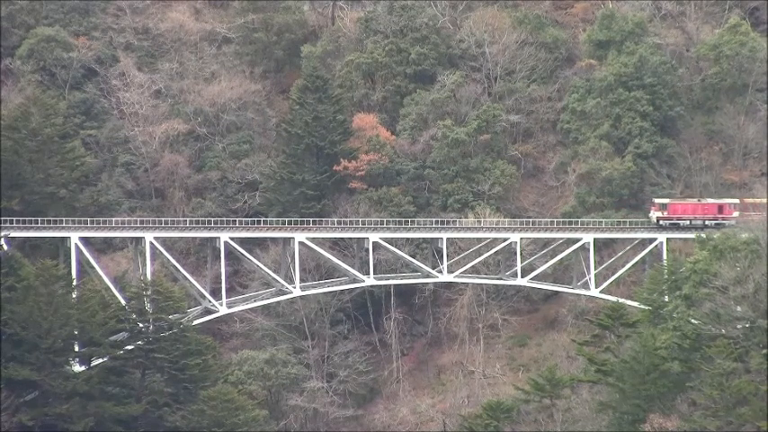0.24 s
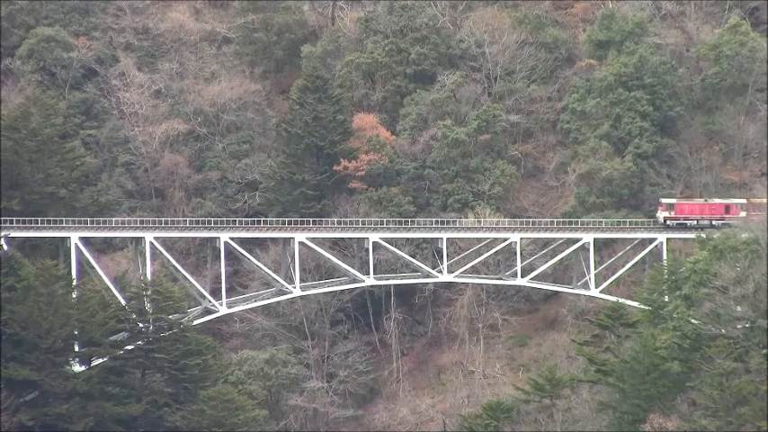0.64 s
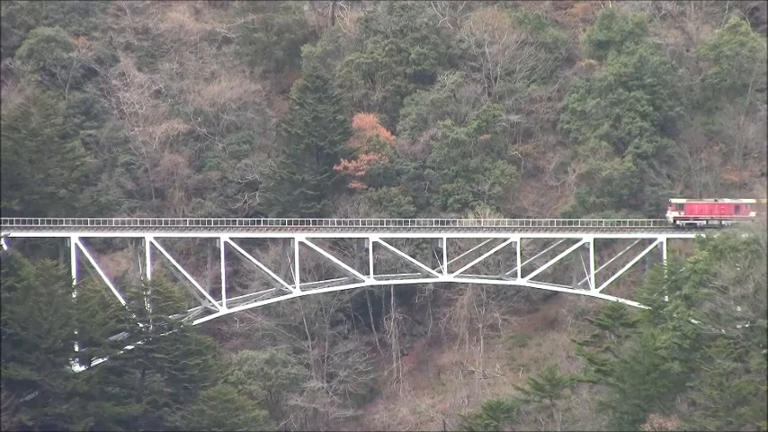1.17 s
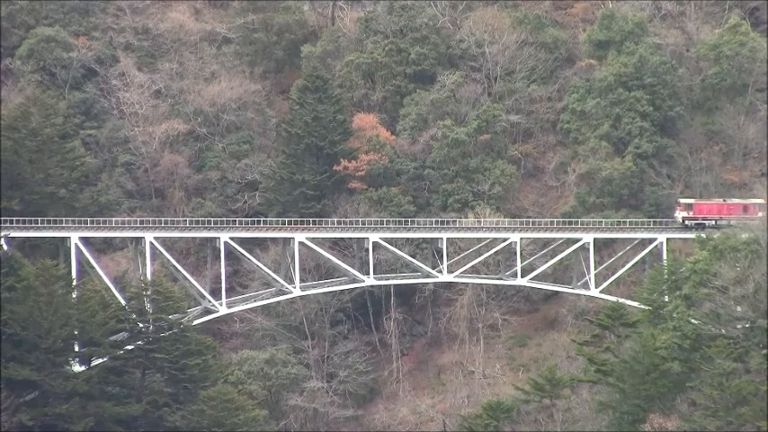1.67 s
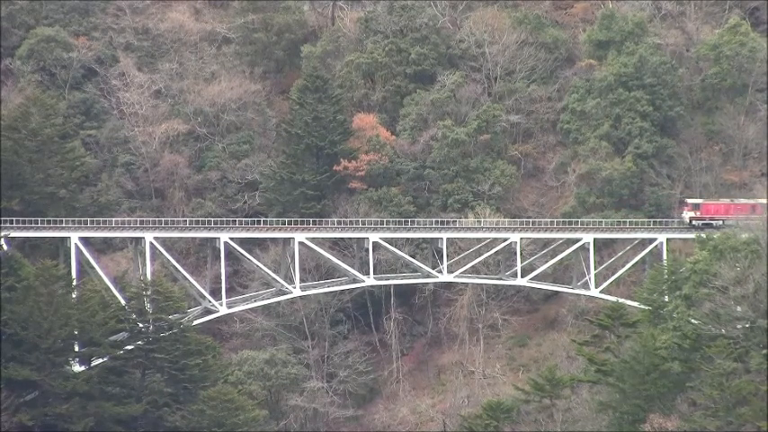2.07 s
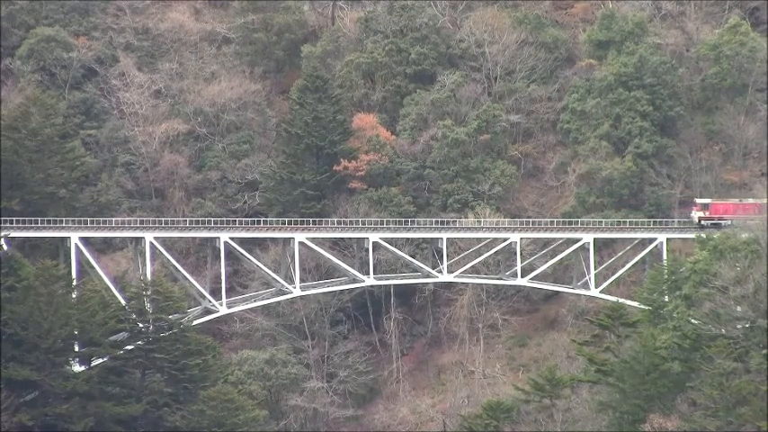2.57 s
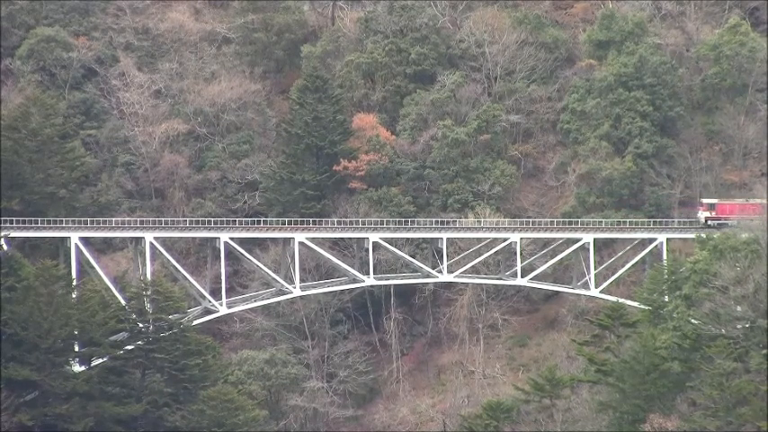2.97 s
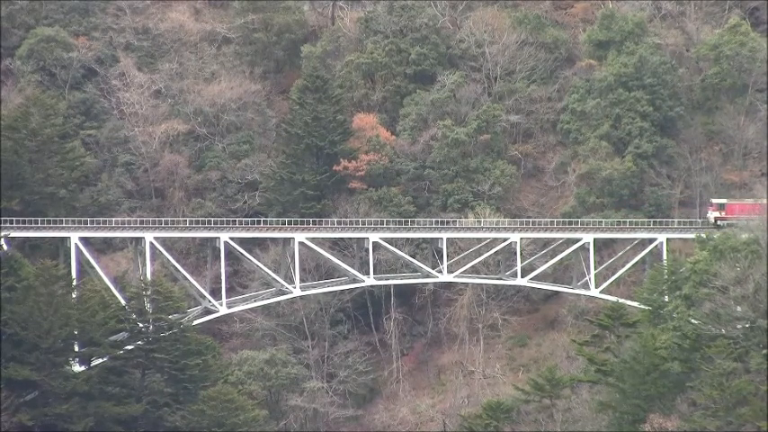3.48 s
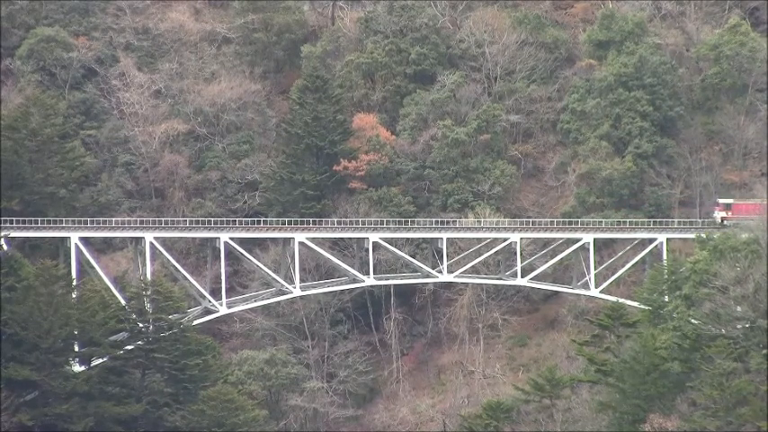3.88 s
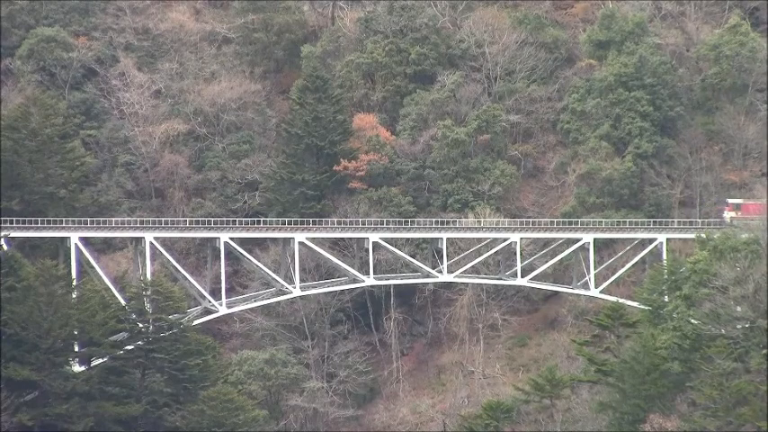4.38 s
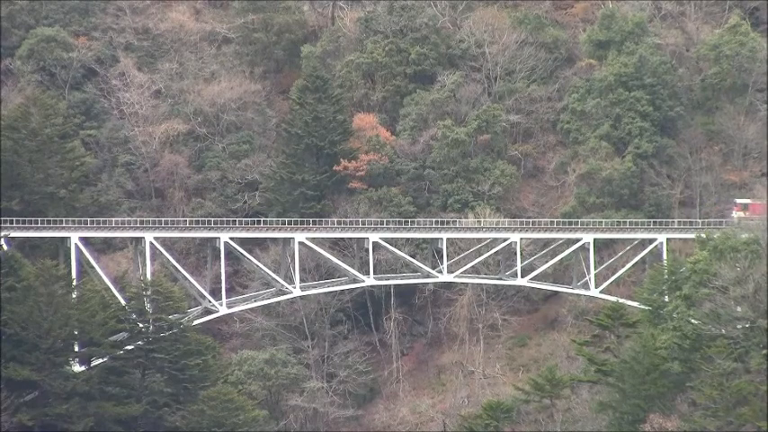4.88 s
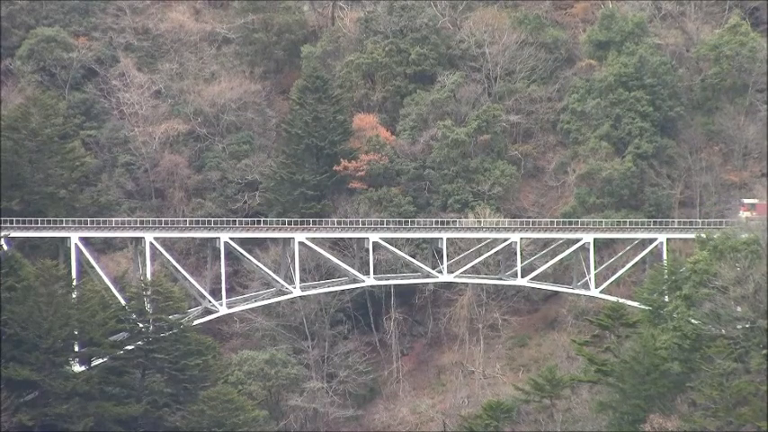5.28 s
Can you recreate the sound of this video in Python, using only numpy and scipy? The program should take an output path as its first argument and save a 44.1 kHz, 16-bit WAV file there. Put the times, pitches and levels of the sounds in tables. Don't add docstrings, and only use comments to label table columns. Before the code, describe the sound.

Birds chirp over a faint far train rumble while a camera clicks three times up close, followed by a hard latch click and sleeve rubbing.

```python
import sys
import numpy as np
from scipy import signal
from scipy.io import wavfile

SR = 44100
rng = np.random.default_rng(int(sys.argv[2]) if len(sys.argv) > 2 else 0)


def log_audio(samples):
    frames = np.atleast_2d(samples).T
    limited = np.clip(frames, -1, 1)
    pcm = np.round(limited * 32767).astype(np.int16)
    wavfile.write(sys.argv[1], SR, pcm)


def invert_db(x):
    u = np.asarray(x, float) / 20
    return 10 ** u


N = 244297

# time in seconds, gust in dB, liveliness of the far birds in dB.
AIR = [(0, 0.3, 4.5), (.62, -0.4, -0.5), (0.999, 0, 5), (1.5, 0, 1), (2.0, 1.4, 1), (2.45, 2, 3),
       (2.75, 1.4, -3.5), (3.4, 0, -6), (3.6, 0.5, -1.5), (4.15, -3, -2.5), (4.5, -2.5, 0.5),
       (4.8, -8.5, -3), (5.0, -5, 0.5), (5.54, -3.5, -3)]
# frequency in Hz, likeness from 0 to 1.
LIKENESS = [(60, 0.82), (180, 0.65), (550, 0.39), (1650, 0.82), (4970, 0.95), (15000, 0.33)]
# time of the shutter snap in seconds, strength in dB.
SHOTS = [
    (0.7518, -1.5),
    (1.2518, -1.2),
    (1.7403, -1.54),
]
# time in seconds, peak level in dB.
LATCH_SNAP = [
    (3.6578, -0.9),
]


def rms_one(x):
    return x / np.sqrt(np.mean(x ** 2) + 1e-20)


def at_hz(points, hz):
    table = np.array(points)
    return np.interp(np.log(hz), np.log(table[:, 0]), table[:, 1])


def drift(rate_hz, size):
    r = np.exp(-2 * np.pi * rate_hz * 16 / SR)
    white = rng.standard_normal(size // 16 + 1002)
    slow = signal.lfilter([1], [1, -2 * r, r * r], white)[1000:]
    return np.interp(np.arange(size) / 16, np.arange(len(slow)), rms_one(slow))


def ring(clicks, hz, t60):
    r = invert_db(-60 / (t60 * SR))
    w = 2 * np.pi * hz / SR
    return signal.lfilter([0, np.sin(w)], [1, -2 * r * np.cos(w), r * r], clicks + 1e-18)


def add(track, s, sound, pan_db):
    i = max(round(s * SR), 0)
    sides = invert_db([[pan_db / 2], [-pan_db / 2]])
    track[:, i:i + sound.shape[-1]] += sound[..., :N - i] * sides


def banded_noise(spectrum, patchy_db, likeness, size=N):
    out = 0
    octaves = np.log2(spectrum[-1][0] / spectrum[0][0])
    edges = spectrum[0][0] * 2 ** np.arange(0, octaves + .2, 1 / 3)
    white = rng.standard_normal((2, 2, size))
    for k, (low, high) in enumerate(zip(edges, edges[1:])):
        band = signal.butter(2, [low, min(high, .45 * SR)], "band", fs=SR, output="sos")
        mid, side = signal.sosfilt(band, white[k % 2])
        hz = np.sqrt(low * high)
        alike = np.clip(at_hz(likeness, hz), 0, 1)
        gain = invert_db(at_hz(spectrum, hz) + patchy_db * drift(10.0, size))
        out = out + gain * (np.sqrt(1 + alike) * mid + np.sqrt(1 - alike) * side * [[1], [-1]])
    return rms_one(out)


def note(s, length_s, first_hz, last_hz, level_db, rise_bend=1.9, fall_bend=1.45):
    u = np.linspace(0, 1, num=13)
    glide = 1 - (1 - u) ** rise_bend if last_hz > first_hz else u ** fall_bend
    fade_db = np.interp(u, [0, 0.55, 1], [0.5, 0, -3])
    return np.transpose([s + length_s * u, first_hz + (last_hz - first_hz) * glide, level_db + fade_db])


def whistle(rows, rough_db, waver_hz):
    s, hz, level_db = np.transpose(rows)
    t = np.arange(s[0], s[-1], 1 / SR)
    pitch = np.interp(t, s, hz) + waver_hz * drift(62.6, len(t))
    ends = np.clip(np.minimum(t - s[0], s[-1] - t) / 0.001, 0, 1)
    breath = invert_db(np.interp(t, s, level_db) + rough_db * drift(90, len(t)))
    return np.sqrt(2) * ends * breath * np.sin(2 * np.pi * np.cumsum(pitch) / SR)


def blows(events, modes, strike_db, contact_s, shake_db, shake_s, crack_db, pan_db):
    out = np.zeros((2, N))
    t = np.arange(2600) / SR
    small_body = signal.butter(4, 0.57 * modes[0][0], "high", fs=SR, output="sos")
    for s, peak_db, *direction in events:
        shape = np.exp(-t / contact_s) + invert_db(shake_db) * np.exp(-t / shake_s)
        chatter = rng.standard_normal(len(t)) * shape
        chatter[0] = invert_db(strike_db) * np.prod(direction)
        own_db = rng.normal(0, 0.99, len(modes))
        body = 0
        for k, (hz, level_db, t60) in enumerate(modes):
            body = body + (-1) ** k * invert_db(level_db + own_db[k]) * ring(chatter, hz, t60)
        body = signal.sosfilt(small_body, body)
        crack = np.diff(rng.standard_normal((2, len(t) + 1))) * shape
        add(out, s, invert_db(peak_db) * (body / np.abs(body).max() + invert_db(crack_db) * crack), pan_db)
    return out


def slips(events, cycles, contact_s, edge_db, gain_db):
    out = np.zeros((2, N))
    t = np.arange(700) / SR
    for s, peak_db, hz in events:
        puff = rng.standard_normal(len(t)) * np.exp(-t / contact_s)
        slip = ring(puff, hz, cycles / hz) + invert_db(edge_db) * ring(puff, 2.56 * hz, 2.0 / hz)
        slip = signal.lfilter(*signal.butter(2, 0.52 * hz, "high", fs=SR), slip)
        add(out, s, invert_db(peak_db + gain_db) * slip / np.abs(slip).max(), rng.normal(.3, 1.0))
    return out


def pressure(t, s, top_db, rise, fall):
    after = t - np.asarray(s)[:, None]
    slope_db = np.where(after < 0, rise * after, -fall * after)
    power = invert_db(2 * (np.asarray(top_db)[:, None] + slope_db))
    return np.sqrt(np.sum(power, axis=0))


def hillside():
    # frequency in Hz, level in dB per Hz.
    rumble = [(22, -5), (45, -7), (58, -1), (67, -6.5), (80, -0.5), (125, -8.5), (160, 0), (190, -9),
              (235, 1.5), (320, -18), (420, -49)]
    wind = [(120, -38), (220, -5), (300, -2), (500, -3), (900, -4.5), (1500, -10), (2200, -11.5),
            (4000, -38)]
    chorus = [(1200, -10), (2000, -1), (2600, 4.5), (3400, 4), (4200, 1), (5000, 4.5), (6000, -23.5),
              (9000, -61)]
    hiss = [(2500, -50), (4500, -7.5), (6000, 1.5), (8000, -4.5), (11000, -7), (14000, -10.5), (16000, -8)]
    t = np.arange(N) / SR
    s, gust_db, lively_db = np.transpose(AIR)
    gust_db, lively_db = np.interp(t, s, gust_db), np.interp(t, s, lively_db)
    train_db = -50.5 - 0.63 * t + 0.52 * gust_db
    out = invert_db(train_db) * banded_noise(rumble, patchy_db=0.4, likeness=LIKENESS)
    out += invert_db(-49.5 + gust_db) * banded_noise(wind, patchy_db=1.0, likeness=LIKENESS)
    out += invert_db(-51.5 + lively_db) * banded_noise(chorus, patchy_db=1.8, likeness=LIKENESS)
    out += invert_db(-57 + 0.74 * gust_db) * banded_noise(hiss, patchy_db=1.1, likeness=LIKENESS)
    return out


def far_birds():
    s, _, lively_db = np.transpose(AIR)
    rows = []
    for _ in range(170):
        start = rng.uniform(0, N / SR - .1)
        length_s = .01 + .025 * rng.random()
        hz = 3300 * 2 ** rng.normal(0, .25)
        last_hz = hz * (1 + .04 * rng.normal(.3, 1))
        level_db = -61.5 + 2.5 * rng.standard_normal() + np.interp(start, s, lively_db)
        rows.append((start, length_s, hz, last_hz, level_db))
    return rows


def birds():
    # start in seconds, length in seconds, first Hz, last Hz, level in dB.
    high_bird = [(0, 0.043, 4580, 4730, -44), (.04, .012, 5100, 5170, -46), (.058, .015, 4720, 4720, -50),
                 (.09, 0.11, 5200, 5150, -58), (0, .012, 4380, 4470, -44), (.405, .009, 5200, 4650, -49),
                 (.412, .013, 4650, 4615, -43.5), (.63, .02, 3800, 4600, -51),
                 (2.09, 0.026, 4500, 4900, -51), (5.165, .03, 3160, 4700, -56),
                 (.945, 0.054, 4100, 4780, -50), (.995, 0.038, 4880, 4780, -55),
                 (1.092, 0.017, 4250, 4700, -53), (1.126, 0.047, 4250, 5600, -44.5),
                 (2.09, 0.089, 4450, 6050, -56), (2.22, 0.026, 4780, 5000, -51),
                 (3.52, 0.068, 3600, 5200, -58), (4.41, 0.067, 4250, 4450, -55),
                 (4.448, 0.03, 4550, 4800, -53), (4.83, 0.05, 4900, 5800, -55.5),
                 (5.465, 0.015, 4900, 4150, -51), (5.488, 0.0078, 3720, 3480, -48),
                 (3.16, 0.054, 6800, 6450, -56)]
    near_bird = [(.01, 0.045, 3360, 3430, -52), (.05, 0.033, 3490, 3050, -42.5),
                 (.135, 0.02, 3430, 3320, -44), (.35, 0.047, 3500, 3580, -45),
                 (.39, 0.18, 3490, 3500, -53.5), (1.085, .02, 3190, 3230, -45),
                 (1.162, 0.035, 3330, 3570, -40), (3.145, 0.065, 3430, 3350, -50),
                 (3.19, .03, 3300, 2800, -50.5), (3.21, .17, 3420, 3350, -60),
                 (3.735, 0.082, 3370, 3600, -54.5), (4.42, 0.056, 3000, 3410, -58),
                 (4.463, 0.031, 3500, 3430, -50.5), (4.778, 0.044, 2900, 3370, -46.5),
                 (4.82, 0.038, 3500, 3660, -44), (4.855, 0.019, 3600, 3270, -57),
                 (4.88, 0.0079, 3400, 3250, -46.5)]
    thin_bird = [(.25, 0.098, 7540, 7300, -55.5), (.415, 0.087, 7080, 7410, -56),
                 (.55, 0.03, 7600, 7450, -57), (.595, 0.041, 7200, 7000, -55)]
    rising_bird = [(.26, 0.09, 3200, 4400, -48), (.72, 0.025, 4050, 4040, -46),
                   (1.437, 0.12, 3300, 4250, -46), (1.51, .04, 3900, 3850, -52),
                   (1.558, .028, 3350, 3250, -49), (1.56, .02, 3950, 3650, -50),
                   (1.6, .035, 4050, 4000, -53), (1.635, .03, 3650, 4050, -52),
                   (1.652, 0.04, 4100, 4200, -45), (1.71, .025, 4150, 4030, -45),
                   (2.365, .02, 3330, 3420, -49.5), (2.405, 0.04, 3760, 3910, -46)]
    low_bird = [(.9, .015, 2690, 2700, -49), (1.005, 0.013, 3230, 3180, -42),
                (1.02, 0.064, 2980, 2990, -44), (1.935, 0.041, 3300, 3220, -50.5),
                (1.94, 0.074, 2960, 2940, -49), (1.99, 0.083, 2770, 2600, -54.5),
                (4.693, 0.02, 3100, 3000, -53), (5.255, 0.07, 2740, 2730, -58),
                (.61, 0.038, 2550, 2710, -54), (5.31, 0.023, 2780, 2790, -49),
                (5.36, 0.05, 2770, 2710, -51), (5.402, .033, 2784, 2930, -48),
                (5.43, 0.026, 2860, 3160, -55)]
    deep_chirps = [(2.285, .028, 1620, 1880, -43.5), (2.33, .012, 1780, 1600, -47),
                   (3.165, .014, 1750, 1760, -53), (3.7, .02, 1717, 1680, -49),
                   (4.56, .015, 1800, 1780, -45)]
    out = np.zeros((2, N))
    # its notes, pan in dB, waver in Hz
    flock = [(high_bird, .3, 70), (near_bird, .4, 45), (thin_bird, 1.1, 40), (rising_bird, .3, 45),
             (low_bird, -.4, 60), (deep_chirps, .3, 40), (far_birds(), .2, 60)]
    for rows, pan_db, waver_hz in flock:
        for row in rows:
            add(out, row[0], whistle(note(*row), rough_db=2.6, waver_hz=waver_hz), pan_db)
    fade = invert_db(-60 * np.arange(12000) / SR / 0.43)
    tail = rng.standard_normal((2, 12000)) * fade
    wet = signal.fftconvolve(out, tail / np.sqrt(np.sum(tail ** 2) / 2), axes=1)[:, :N]
    return out + invert_db(-0.5) * wet


def motor():
    # seconds after the snap, attack in seconds,
    # hold in seconds, release in seconds, level in dB.
    strokes = [
        (-.085, 0.034, 0.01, 0.029, -29.5),
        (0, 0.0013, .001, 0.0018, -21.5),
        (.004, 0.0009, 0.00083, 0.014, -22),
        (.015, .004, .03, .012, -47),
        (0.033, 0.043, 0.067, 0.032, -33),
    ]
    # seconds after the snap, length in seconds, first Hz, last Hz, level in dB.
    whines = [(.072, .02, 5150, 5050, -34), (.09, .014, 5030, 4650, -29), (.103, .014, 4620, 4150, -35),
              (.118, .016, 4200, 4450, -37), (.1, .005, 6900, 6800, -34), (.104, .012, 6750, 6250, -28),
              (.115, .033, 6350, 6850, -33.5), (.085, .05, 9250, 9200, -47), (.07, .035, 3600, 3300, -42),
              (.072, .045, 2600, 2100, -43)]
    # frequency in Hz, level in dB per Hz.
    gear_spectrum = [(410, -14), (700, -17.5), (1800, -8.5), (3890, -4.5), (4730, -13), (5840, -6.5),
                     (6570, -15), (8210, -11.5), (14400, -24.5), (16000, -41)]
    t = np.arange(N) / SR
    out = np.zeros((2, N))
    effort = 0
    for s, shot_db in SHOTS:
        for after, attack, hold, release, level_db in strokes:
            corners = s + after + np.cumsum([0, attack, hold, release])
            shape_db = np.interp(t, corners, [-19, 0, 2.5, -19], left=-120, right=-120)
            effort = effort + invert_db(shot_db + level_db + shape_db)
        for after, *glide in whines:
            pitch_curve = note(after, *glide, rise_bend=1.2, fall_bend=1.7)
            whine = whistle(pitch_curve, rough_db=3.0, waver_hz=80)
            add(out, s + after, invert_db(shot_db) * whine, .6)
    teeth = invert_db(3.0 * drift(700, N))
    gears = banded_noise(gear_spectrum, patchy_db=1.5,
                         likeness=[(1000, 1.0), (5000, 0.95), (12000, 0.14)], size=2 * SR)
    add(out, 0, (effort * teeth)[:2 * SR] * gears, 0)
    return out


def mirror():
    # seconds after the snap, peak level in dB.
    contacts = [(-.0735, -24), (-.0578, -18.5), (-.0535, -22.5), (-.05, -24), (-.0461, -14.5),
                (-.0447, -17.5), (-.0405, -12), (.04, -38), (.055, -35), (0.072, -35), (.092, -32),
                (.116, -42), (0.13, -23)]
    # frequency in Hz, level in dB, time to fade 60 dB in seconds.
    mirror_box = [(560, -13, 0.011), (890, -6.5, 0.0096), (1600, -1.5, 0.01), (2070, -5.5, 0.015),
                  (2550, -3.5, 0.009), (3020, -5.5, 0.019), (3500, -1, 0.0087), (3860, -5, 0.011),
                  (4500, -14, 0.0065), (5200, -7, 0.0092), (5800, -5, 0.0063), (7200, -3, 0.0055),
                  (8050, -17, .012), (9300, -19, .012)]
    events = []
    for s, shot_db in SHOTS:
        for after, peak_db in contacts:
            loose_db = 0.8 * rng.standard_normal()
            events.append((s + after, peak_db + shot_db + loose_db))
    return blows(events, mirror_box, strike_db=12.0, contact_s=0.0018, shake_db=-24, shake_s=0.0034,
                 crack_db=-19.0, pan_db=1.5)


def shutter():
    # seconds after the snap, peak level in dB, direction of travel.
    pushes = [
        (.0004, -10.5, 1),
        (.00442, -10, 1),
    ]
    curtain = [
        (-.0048, -25, 1),
        (.00107, -14, 1),
        (.0051, -13, 1),
        (.0085, -28, 1),
    ]
    # frequency in Hz, level in dB, time to fade 60 dB in seconds.
    shutter_box = [(520, -9.5, 0.016), (730, 0, 0.012), (1000, -2.5, 0.01), (1186, -3, 0.015),
                   (1490, 5, 0.0089), (1800, 1, 0.0091), (2000, -1.5, 0.013), (2600, 0, 0.028),
                   (3050, -16, 0.035), (3630, -4, 0.0074), (4250, -22, 0.0045), (5100, 1.5, 0.0072),
                   (6050, -8, 0.012), (7250, -6, .008)]

    def every_shot(rows):
        return [(s + after, db + shot_db, way) for s, shot_db in SHOTS for after, db, way in rows]

    dull = blows(every_shot(pushes), shutter_box[:8], strike_db=26, contact_s=.0008,
                 shake_db=-30, shake_s=.004, crack_db=-40, pan_db=.9)
    sharp = blows(every_shot(curtain), shutter_box, strike_db=26, contact_s=.0012,
                  shake_db=-17, shake_s=.0045, crack_db=-21, pan_db=.9)
    return dull + sharp


def sleeve_slips():
    # time in seconds, peak level in dB, pitch in Hz.
    ticks = [(2.2438, -27.5, 2150), (2.064, -32, 4800), (2.169, -35, 5200), (2.298, -34, 6300),
             (2.318, -34, 5000), (2.3867, -38, 2300), (2.4005, -26.5, 2500), (2.4008, -39, 6650),
             (2.433, -43, 5560), (2.459, -28, 1800), (2.484, -33, 2840), (2.5105, -29, 2580),
             (2.5107, -40, 5800), (2.5365, -32.5, 2000), (2.559, -33, 2690), (2.574, -36, 5120),
             (2.604, -30, 2600), (2.628, -45, 6500), (2.8914, -30, 1600), (2.92, -31, 2420),
             (2.939, -32, 2780), (2.984, -35, 2000), (3.008, -40, 2000), (3.035, -33, 2600),
             (3.065, -38, 1500), (3.091, -36, 5000), (3.5793, -28, 3410), (3.5924, -31, 3000),
             (3.7273, -32, 1500), (3.763, -35, 5500), (3.8348, -35, 1590), (3.8763, -33, 5170),
             (4.042, -33.5, 5650), (4.042, -53, 8600), (4.265, -41, 2900), (4.286, -34, 2850),
             (4.377, -27, 13500), (4.94, -25.5, 3200), (4.913, -34, 191), (4.944, -34, 200),
             (4.9587, -22.5, 1540), (4.9595, -24, 2600), (4.9587, -31, 5000), (5.33, -39, 151),
             (5.0263, -31.5, 2500), (5.185, -28, 4500), (5.335, -32, 2000)]
    fibres = [(4.0979, -41, 6330), (4.1176, -40, 6610), (4.1388, -36, 5320), (4.1682, -41, 5150),
              (4.1796, -46.0, 6180), (4.192, -42, 6010), (4.2015, -51, 6160), (4.2167, -34, 6300),
              (4.2333, -48, 6310), (4.2647, -34, 5510), (4.2746, -42, 5530), (4.2862, -43, 5190),
              (4.3353, -23, 5080), (4.3498, -27, 9280), (4.3772, -29.0, 4830), (4.4088, -37.0, 5430),
              (4.447, -31, 5810), (4.4653, -32, 5620), (4.4921, -34, 5750), (4.5167, -32.5, 5750),
              (4.5467, -40, 5790), (4.5554, -42.0, 5170), (4.57, -28, 5430), (4.5958, -43, 5580),
              (4.6067, -46.0, 6440), (4.6183, -42.0, 5580)]
    creak_slips = [(4.2648, -31.5, 880), (4.286, -29, 800), (4.2969, -29, 1490), (4.3165, -33.0, 1140),
                   (4.3342, -29, 1590), (4.3438, -24, 2280), (4.3665, -35, 500), (4.3887, -36, 500),
                   (4.4098, -37, 520), (4.4194, -44, 500), (4.4305, -38, 470), (4.4403, -39, 1360),
                   (4.4708, -33, 750), (4.4942, -34, 430), (4.5191, -35, 370), (4.5488, -30, 686),
                   (4.5658, -23, 1650), (4.607, -30.5, 390), (4.6276, -46, 600), (4.6395, -46, 750),
                   (4.6578, -28.5, 750), (4.671, -39, 520),
                   (4.861, -40, 730), (4.8715, -46, 370), (4.8801, -43, 820), (4.8884, -36, 390),
                    (4.899, -31.5, 430), (4.911, -36, 390), (4.929, -29.5, 746), (4.9474, -24, 300),
                    (4.9596, -33, 1400), (4.9834, -25.5, 370), (4.9902, -34, 340), (5.004, -37, 407),
                    (5.0308, -27, 450), (5.0469, -30, 560), (5.053, -32, 390), (5.063, -28, 470),
                    (5.077, -25, 412), (5.083, -32, 710), (5.1013, -26.5, 372), (5.1192, -36.0, 820),
                    (5.129, -27, 1230), (5.1331, -30, 300), (5.1522, -49, 410), (5.169, -31, 320),
                    (5.1756, -28, 690), (5.19, -27.5, 600), (5.1993, -33, 340), (5.2124, -25.5, 650),
                    (5.226, -30, 540), (5.2334, -34, 650), (5.2417, -30.5, 336), (5.246, -29, 415),
                    (5.2636, -31, 450), (5.2742, -41, 300), (5.2799, -28, 560), (5.2946, -48, 410),
                    (5.3074, -39, 670), (5.3179, -27, 560), (5.328, -26.5, 650), (5.334, -29, 620),
                    (5.3634, -28.5, 520), (5.375, -33, 1080), (5.396, -30, 520), (5.411, -30, 320),
                    (5.4309, -35, 470), (5.445, -33, 950), (5.453, -31, 470), (5.4778, -31, 430),
                    (5.4894, -37.0, 600), (5.499, -39, 388), (5.505, -36.0, 600), (5.517, -28.5, 900),
                    (5.382, -31, 500), (5.427, -31.5, 600), (5.534, -31, 700)]
    creaks = creak_slips
    return (slips(ticks, cycles=3.9, contact_s=0.0017, edge_db=-22, gain_db=0.0)
            + slips(fibres, cycles=6.0, contact_s=.0008, edge_db=-19, gain_db=0.5)
            + slips(creaks, cycles=2.85, contact_s=0.0008, edge_db=-6.5, gain_db=-1.5))


def latch():
    # time in seconds, peak level in dB.
    catches = [
        (3.4712, -22),
        (3.475, -25.5),
    ]
    # frequency in Hz, level in dB, time to fade 60 dB in seconds.
    catch_body = [(1600, 1, 0.0036), (2280, -1.5, 0.0099), (3320, -6.5, 0.0059), (4420, -2, 0.0041),
                  (5000, -4, 0.0088), (6700, -8.5, 0.012)]
    latch_body = [(1930, -22, 0.0086), (2180, -13, .009), (2720, -5, 0.0087), (3600, 3.5, 0.007),
                  (4450, -3.5, 0.0075), (5200, 5.5, 0.0031), (6100, 0, 0.0083), (6500, -0.5, 0.0083),
                  (7840, -5.5, 0.0048), (8600, -9, 0.0058), (10500, -15, 0.0033)]
    seat = blows(catches, catch_body, strike_db=1, contact_s=.0012, shake_db=-4, shake_s=0.006,
                 crack_db=-20.0, pan_db=2.5)
    snap = blows(LATCH_SNAP, latch_body, strike_db=21, contact_s=.0004, shake_db=-6.5, shake_s=0.0055,
                 crack_db=-19, pan_db=.9)
    return seat + snap


def sleeve_drag():
    # time of most pressure in seconds, crackle level in dB, swish level in dB.
    pulls = [
        (4.36, -41.5, -38.5),
        (4.55, -49, -58),
        (4.94, -46, -57),
        (5.09, -48, -62),
        (5.19, -52, -53),
        (5.42, -45.5, -72),
    ]
    # frequency in Hz, level in dB per Hz.
    swish_spectrum = [(1200, -5), (2500, -12), (4500, -1.5), (7000, -1), (10000, -2), (13000, -26),
                      (16000, -12), (17000, -2.5)]
    s, crackle_db, swish_db = np.transpose(pulls)
    out = np.zeros((2, N))
    size = 2 * SR
    t = np.arange(N - size, N) / SR
    dull = pressure(t, s, crackle_db, rise=70, fall=54)
    bright = pressure(t, s, swish_db, rise=166, fall=159)
    hits = rng.random((2, size)) < 450 / SR
    sizes = invert_db(3.5 * np.minimum(rng.exponential(1, (2, size)), 4))
    grains = hits * sizes * rng.choice([-1, 1], (2, size))
    grains = grains + 1.0 * grains[::-1]
    dealt = rng.integers(0, 10, size)
    crackle = 0
    for k, hz in enumerate(np.geomspace(320, 2600, num=10)):
        crackle = crackle + ring(grains * (dealt == k), hz, 0.88 / hz)
    crackle = signal.sosfilt(signal.butter(3, 260, "high", fs=SR, output="sos"), crackle)
    swish = banded_noise(swish_spectrum, patchy_db=2.0, likeness=LIKENESS, size=size)
    swish = invert_db(1.8 * drift(180, size)) * swish
    out[:, -size:] += invert_db(0.5) * dull * rms_one(crackle) + bright * swish
    return out


def scene():
    corners = LATCH_SNAP[0][0] - 0.029 + np.cumsum([0, .006, 0.22, 0.9])
    duck_db = np.interp(np.arange(N) / SR, corners, [0, -3.5, -3.5, 0])
    air = invert_db(3.0 + duck_db) * hillside()
    camera = motor() + mirror() + shutter()
    return air + birds() + camera + sleeve_slips() + latch() + sleeve_drag()


def roll_off(x):
    return signal.sosfilt(signal.butter(12, 16560, fs=SR, output="sos"), x)


def record(dry):
    top_cut = signal.cheby2(10, 60, 16500, fs=SR, output="sos")
    mix = np.clip(signal.sosfilt(top_cut, dry), -1, 1)
    return roll_off(mix)


dry = scene()
out = record(dry)
log_audio(out)
```